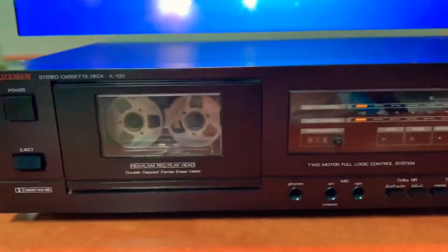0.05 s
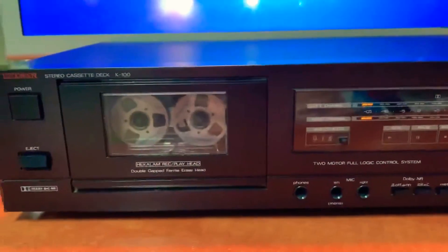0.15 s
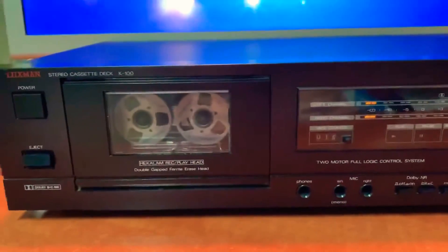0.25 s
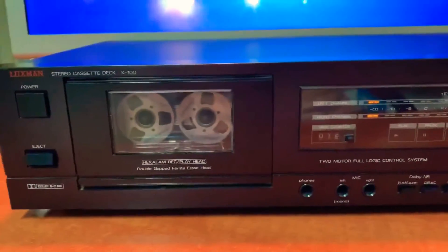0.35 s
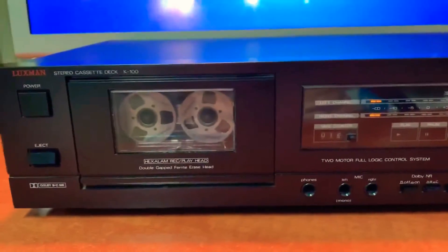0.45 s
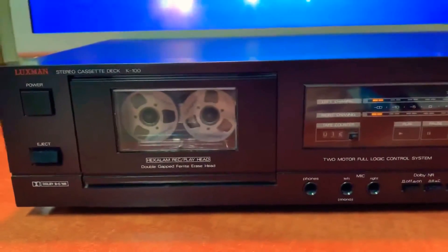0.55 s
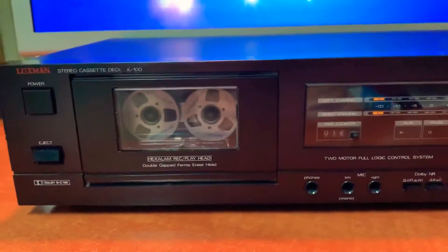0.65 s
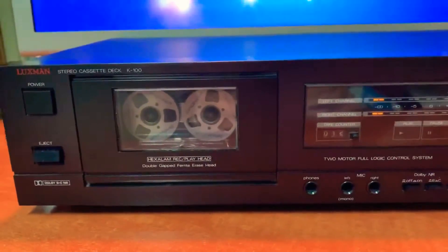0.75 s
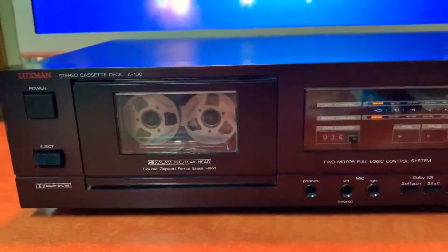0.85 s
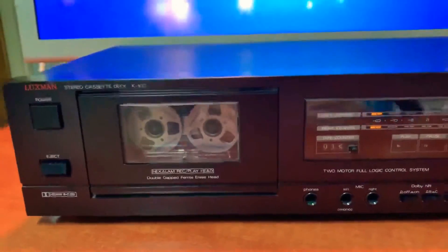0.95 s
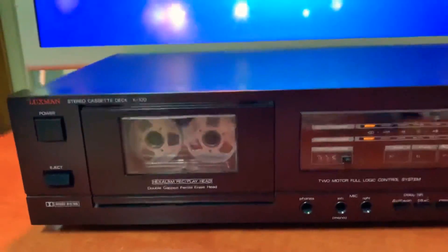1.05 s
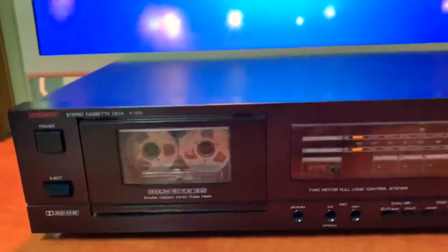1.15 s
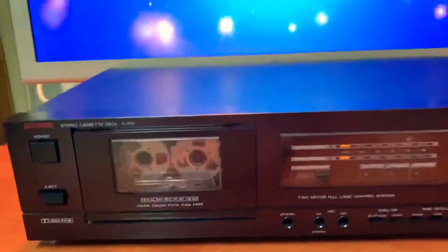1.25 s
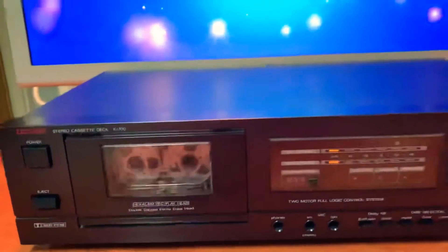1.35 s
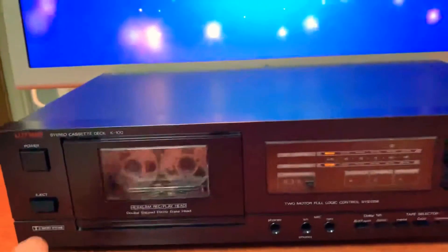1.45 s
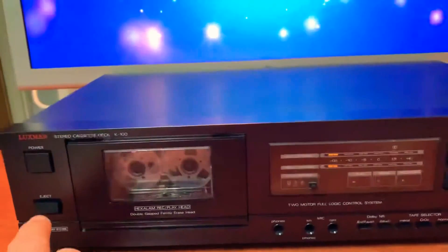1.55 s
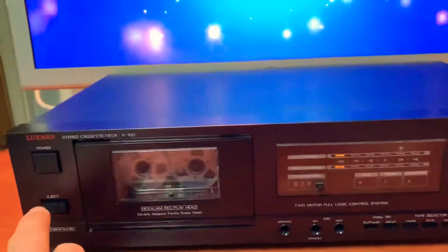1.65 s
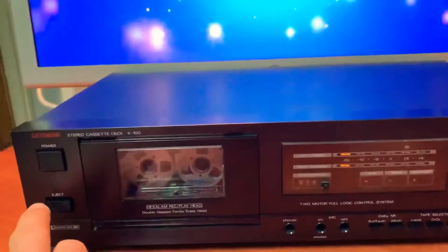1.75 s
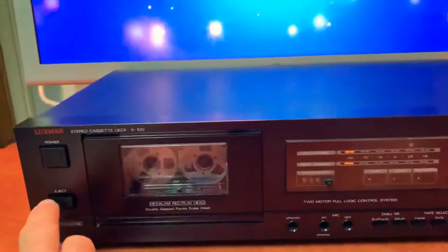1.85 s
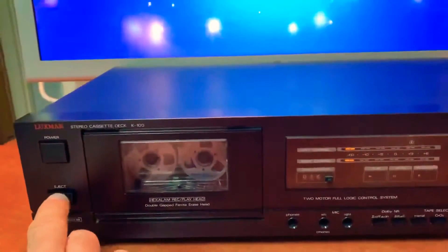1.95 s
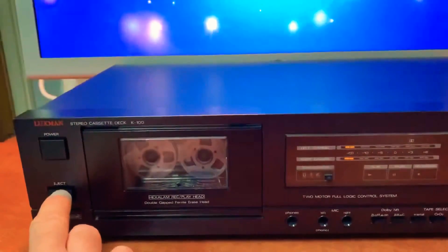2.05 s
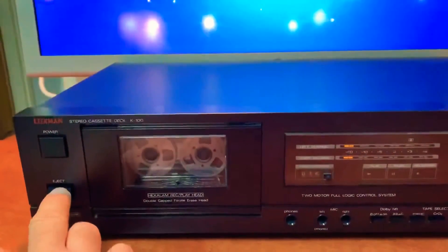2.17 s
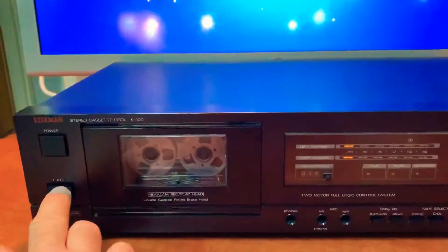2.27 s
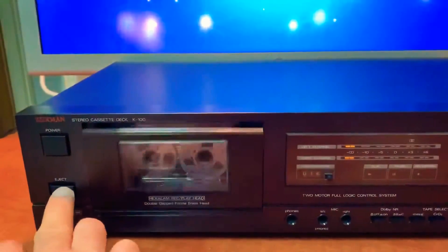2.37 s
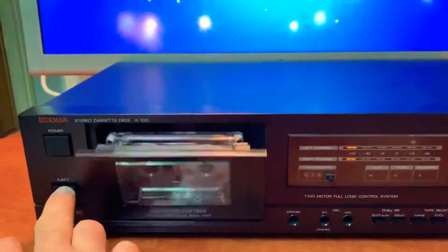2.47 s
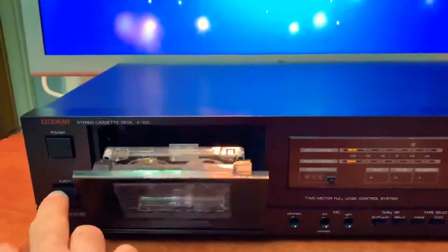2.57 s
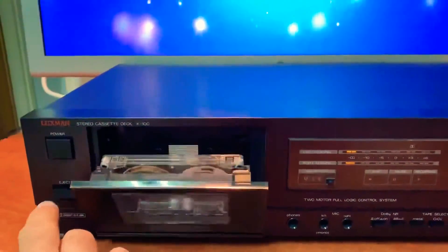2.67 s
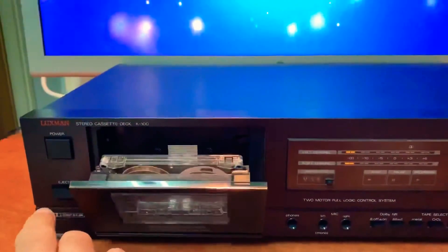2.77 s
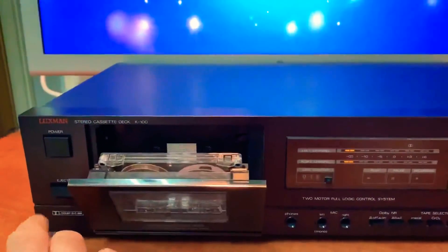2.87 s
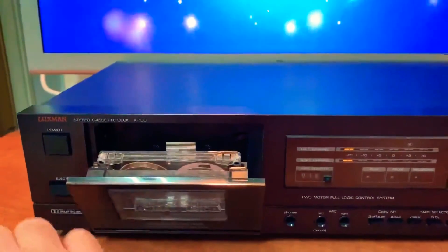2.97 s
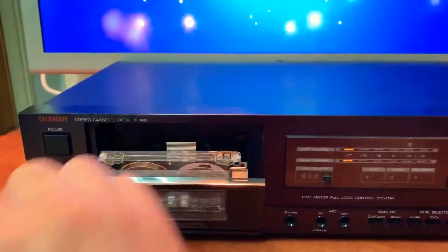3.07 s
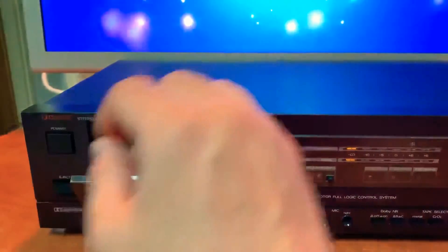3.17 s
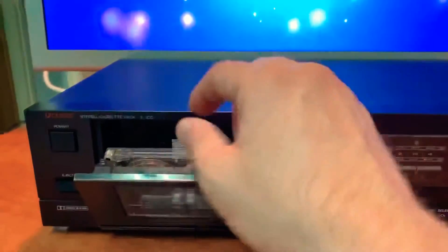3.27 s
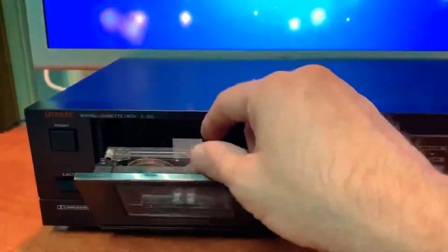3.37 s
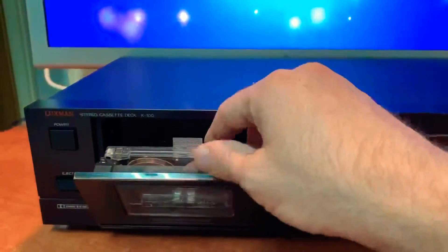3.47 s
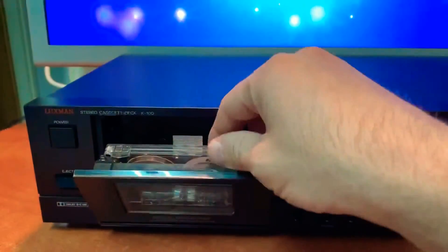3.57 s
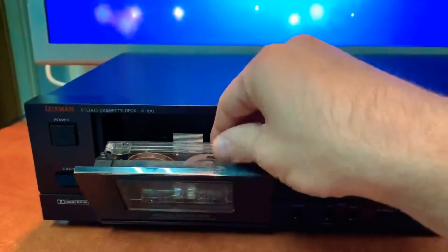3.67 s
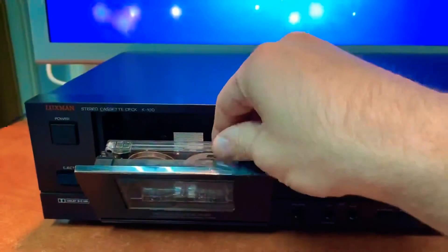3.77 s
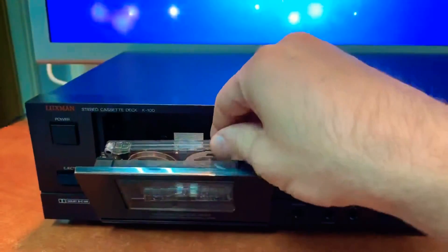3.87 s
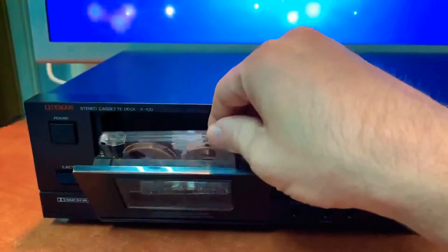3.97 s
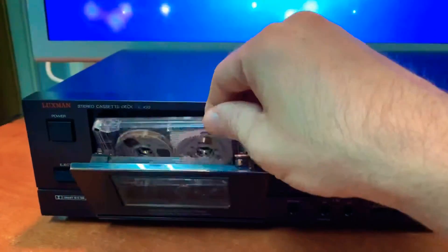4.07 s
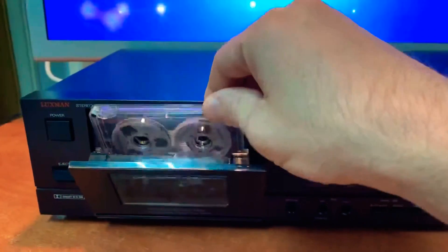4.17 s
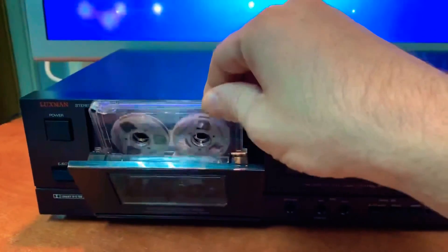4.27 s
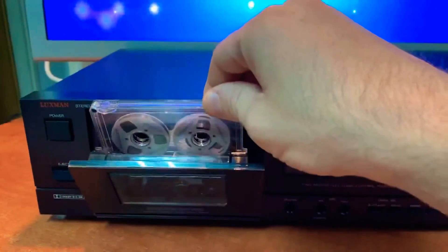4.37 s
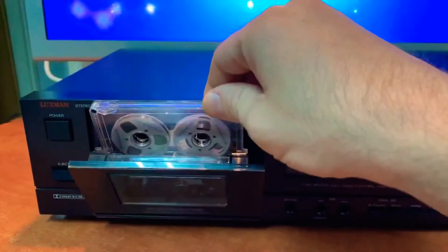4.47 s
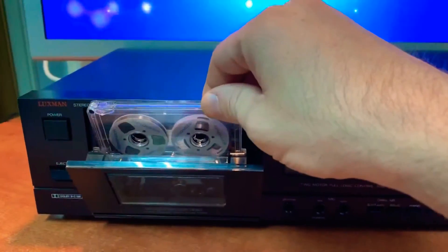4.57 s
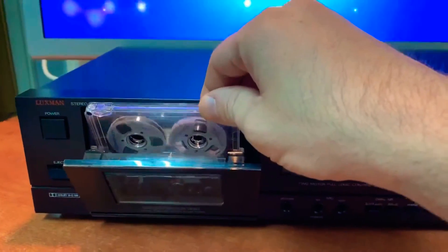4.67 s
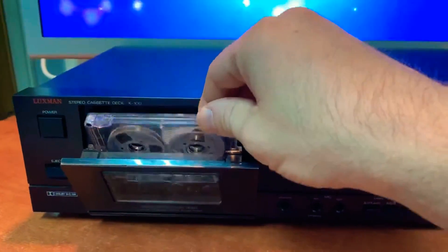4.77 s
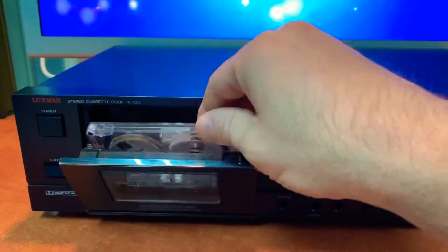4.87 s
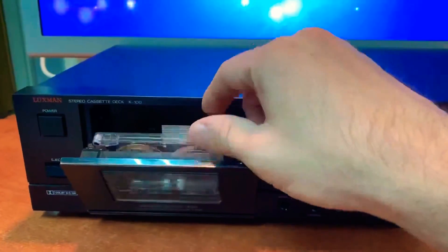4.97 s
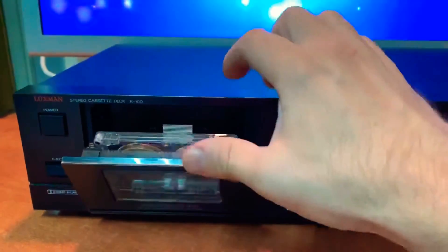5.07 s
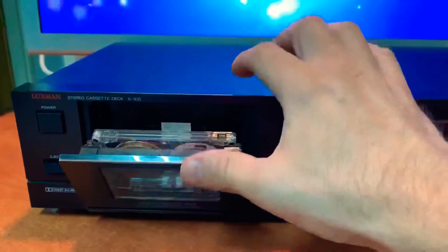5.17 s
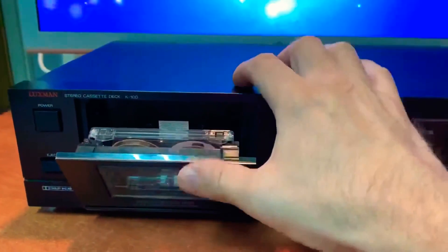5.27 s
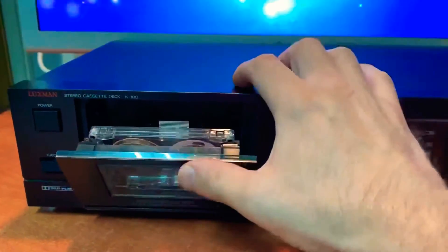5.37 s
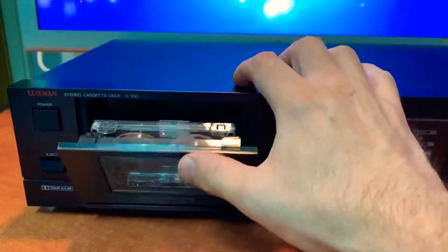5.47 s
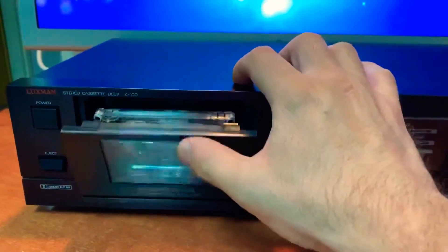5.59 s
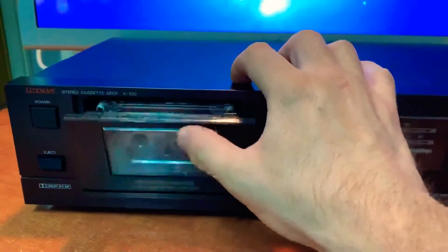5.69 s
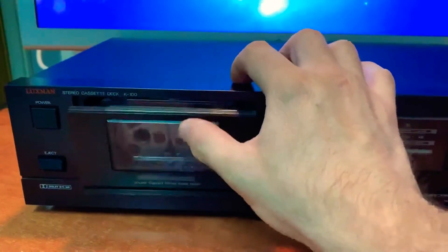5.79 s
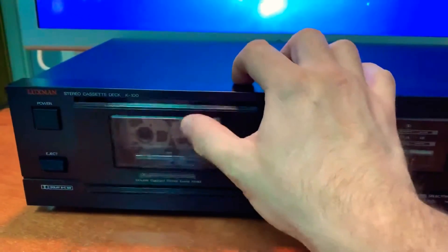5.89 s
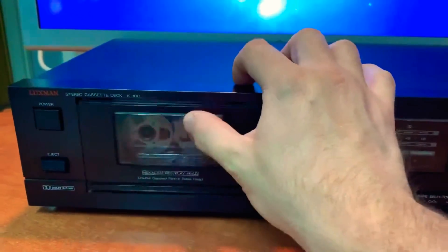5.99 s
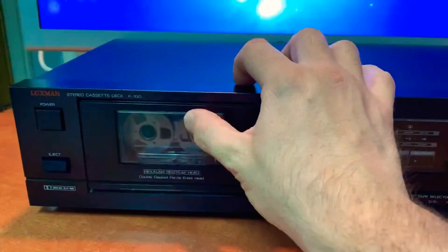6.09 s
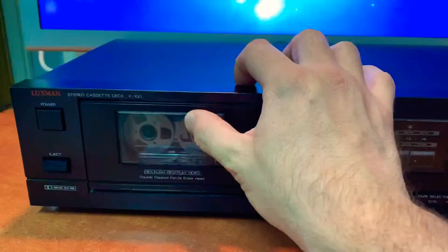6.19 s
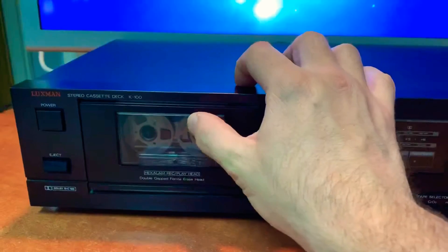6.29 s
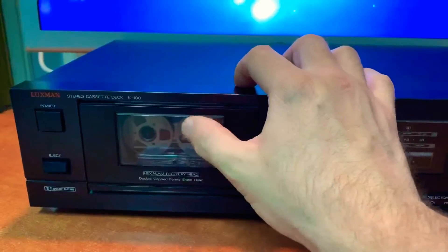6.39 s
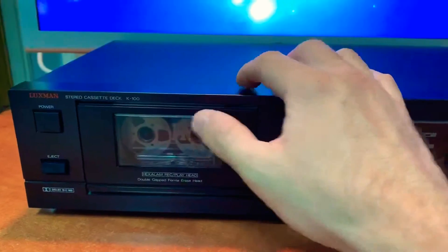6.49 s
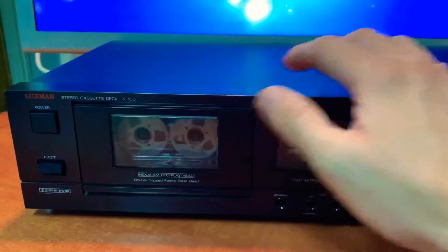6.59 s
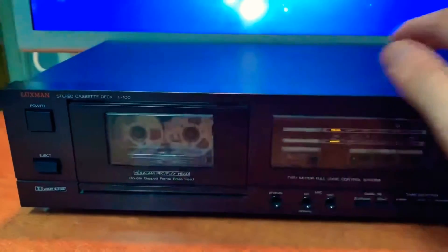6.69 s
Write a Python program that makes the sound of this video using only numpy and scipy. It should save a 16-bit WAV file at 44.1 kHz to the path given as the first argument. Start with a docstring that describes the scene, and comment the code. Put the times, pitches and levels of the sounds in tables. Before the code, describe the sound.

Low fan and mains drone with airy noise runs throughout, growing slightly early on. Over it come a small rattly lever release, a muted button press, a quick run of spring and plastic ticks as the door opens, tiny fingertip rubs, then a hard cassette clack that bounces, and finally a sharp door snap with a boxy boom and springy ring. Recorded near the deck, in a small room with a short tail.

```python
"""Cassette deck eject and reload

A deck on a table in a small humming room, heard close on a hand-held phone with two microphone ports.
The transport stops with a clunk, the eject latch springs the door open, fingers lift the cassette and
let it drop back into its holder, and the door is pushed shut. Clicks ring plastic, spring and shell modes;
levers ring a frame, bumps boom the steel case, skin rubs in noise strokes, and the room adds an echo."""
import sys
import numpy as np
from scipy import signal
from scipy.fft import rfft, irfft
from scipy.io import wavfile
from scipy.ndimage import uniform_filter1d

SR = 44100
rng = np.random.default_rng(int(sys.argv[2]) if len(sys.argv) > 2 else 0)


def store_pcm(level_fs):
    """Save levels as 16-bit WAV."""
    pcm = np.round(np.clip(level_fs, -1, 1) * 32767).astype(np.int16)
    wavfile.write(sys.argv[1], SR, np.atleast_2d(pcm).T)


N = 297234
T = np.arange(N) / SR
RING_T = T[:SR // 3]  # time axis of one impact or echo
TOP_HZ = 15900  # upper limit of the phone and of the small-part resonances


def undb(db):
    """Decibels to gain."""
    return 10 ** (np.asarray(db) / 20)


def spectrum_at(points, hz):
    """Gain of a (freq_hz, level_db) table on a log-frequency axis."""
    point_hz, level_db = np.transpose(points)
    return undb(np.interp(np.log(hz + 1), np.log(point_hz), level_db))


def unit(x):
    """Scale to rms 1."""
    return x / np.sqrt(np.mean(x ** 2))


def blow(x):
    """Scale a transient to the energy of 2 ms at rms 1."""
    energy = np.mean(np.sum(x ** 2, axis=-1))
    return x / np.sqrt(energy / (.002 * SR))


def colour(x, points, tilt_db=0, size=1024):
    """Minimum-phase filter with the given spectrum, tilted in dB per octave about 4 kHz."""
    hz = np.fft.rfftfreq(size, 1 / SR)
    octaves = np.log2(np.maximum(hz, 500) / 4000)  # no further tilt below 500 Hz
    cepstrum = irfft(np.log(spectrum_at(points, hz) * undb(tilt_db * octaves)))
    # folding the cepstrum forward makes the filter causal
    cepstrum[1:size // 2] *= 2
    cepstrum[size // 2 + 1:] = 0
    response = irfft(np.exp(rfft(cepstrum)))
    return signal.fftconvolve(x, response[None], axes=-1)[:, :x.shape[-1]]


# side against mid of sound from all around: freq_hz, level_db
SURROUND_WIDTH = [(60, -32.5), (130, -12), (290, -17.5), (640, -3), (1400, -3.5), (4500, 3.5), (7000, -3.5)]


def diffuse(count, points=((20, 0), (20000, 0))):
    """Stereo noise from all around: alike in the bass, wider above."""
    hz = np.fft.rfftfreq(count, 1 / SR)
    mid, side = rfft(rng.standard_normal((2, count))) * spectrum_at(points, hz)
    side = side * spectrum_at(SURROUND_WIDTH, hz)
    return unit(irfft(np.array([mid + side, mid - side]), count))


def walk(rate):
    """Slow random curve with rms near 1, drawn rate times a second and smoothed twice."""
    k = int(SR / rate)
    steps = np.repeat(rng.standard_normal(N // k + 1), k)
    return unit(uniform_filter1d(uniform_filter1d(steps, k), k)[:N])


def fade(t60):
    """Exponential decay by 60 dB in t60 seconds."""
    return np.exp(-np.log(1000) * RING_T / max(t60, 1e-3))


def onset(rise_s):
    """Exponential rise towards 1 with time constant rise_s."""
    return 1 - np.exp(-RING_T / rise_s)


def grains(spread_db, hold_s):
    """Gain that jumps to a new random level every hold_s, with rms 1."""
    step = (RING_T / max(hold_s, 1 / SR)).astype(int)
    return unit(undb(spread_db * rng.standard_normal(len(RING_T))[step]))


def ring(modes, centre_hz, reach, scatter_db, rise_s, length=1):
    """Modes struck once; the blow favours those within reach octaves of centre_hz; length scales decay."""
    sound = 0
    for hz, db, t60 in modes:
        level_chance, phase_chance = rng.standard_normal(2)
        favour = 1 / (1 + (np.log2(hz / centre_hz) / reach) ** 2)
        wave = np.sin(2 * np.pi * hz * RING_T + 1.2 * phase_chance)
        sound = sound + undb(db + scatter_db * level_chance) * favour * fade(t60 * length) * wave
    return blow(sound * onset(rise_s))


def panned(pan_db):
    """Gains of the two ports for a level difference of left minus right."""
    return undb(np.array([[pan_db], [-pan_db]]) / 2)


def add(track, s, sound):
    """Mix a sound in at time s."""
    start = int(s * SR)
    track[:, start:start + sound.shape[-1]] += sound[..., :N - start]


def tone(hz, waver_db=2.5, drift_hz=1.223):
    """A sine line that wavers in level and pitch."""
    phase = 2 * np.pi * np.cumsum(hz + drift_hz * walk(9)) / SR
    return undb(waver_db * walk(7)) * np.sqrt(2) * np.sin(phase)


# spectra of the rushing air and the thin hiss: freq_hz, level_db (relative)
AIR_COLOUR = [(15, -26.5), (28, -9), (55, -6), (82, -6), (102, -10.5), (151, -8), (188, -2), (273, -10),
              (385, -12.5), (530, -13.5), (730, -23), (1900, -28.5), (3120, -37), (5500, -51),
              (9000, -55.5), (16000, -86)]
HISS_COLOUR = [(9000, -49.5), (12000, -16), (13200, -5), (14200, 1), (15600, 6), (17000, -37.5)]
# fan and mains tones, at the full level the hum reaches: pitch_hz, level_db
HUM_TONES = [(75.2, -47), (112.5, -53.5), (135.5, -56.5), (226, -55.5), (302, -59.5), (442, -60),
             (511, -59), (544, -58), (1200, -65)]
# deepest drone: time_s, level_db
DRONE_LEVEL = [(0.06, -51.5), (1.17, -55), (1.3, -77), (1.58, -56), (3.22, -43.5), (5.11, -50.5),
               (6.27, -39), (6.57, -59), (6.7, -44)]
# strongest fan tone: time_s, level_db (before a small trim)
FAN_LEVEL = [(0, -55.5), (1.3, -50.5), (2.5, -44), (3.2, -50), (4.1, -47), (4.7, -41), (5.1, -52),
             (5.5, -44.5), (5.95, -48.5), (6.5, -43.5)]
DRONE_HZ, FAN_HZ = 50.4, 187.3
HUM_START_DB, HUM_FULL_S = -8.5, 2.46  # air, hiss and hum tones grow from this far down, then hold


def hum(air_db=-41.0, hiss_db=-61.0, hiss_follow=0.95, fan_trim_db=-0.5, lag_s=0.00014):
    """Fans and mains drone in wavering tones over rushing air and a thin high hiss."""
    level_db = HUM_START_DB * np.maximum(1 - T / HUM_FULL_S, 0)
    drone_db = np.interp(T, *np.transpose(DRONE_LEVEL))
    drone = tone(DRONE_HZ, waver_db=0.5, drift_hz=0.72) * undb(drone_db)
    fan_db = fan_trim_db + np.interp(T, *np.transpose(FAN_LEVEL))
    fan = tone(FAN_HZ, waver_db=2.0, drift_hz=5.87) * undb(fan_db)
    lines = sum(undb(db) * tone(hz) for hz, db in HUM_TONES)
    tones = drone + fan + lines * undb(level_db)
    tones = np.array([np.interp(T - lag_s, T, tones), tones])  # they come from the right
    air = diffuse(N, AIR_COLOUR) * undb(air_db + 0.15 * walk(4.7) + level_db)
    hiss = diffuse(N, HISS_COLOUR) * undb(hiss_db + hiss_follow * level_db)
    return tones + air + hiss


# sprung levers inside the case:
# start_s, level_db (relative), rattle_t60_s, tilt_db_per_octave, strongest_frame_hz
LEVER_RELEASES = [(0.9057, -27, 0.041, -1, 950), (.909, -29.5, 0.022, 2, 2000), (.914, -27, 0.11, -1, 1300),
                  (.932, -30, 0.044, 0, 420), (.946, -36, 0.11, 4, 1400), (.9805, -38, .012, -5, 800),
                  (2.423, -37, 0.027, -8.5, 420), (2.439, -33, .03, -11, 1800), (2.491, -28, 0.035, 0, 950),
                  (2.496, -23, 0.11, 1, 1950), (2.513, -26.5, 0.027, 1, 905),
                  (2.523, -29.5, 0.079, 1.5, 1100), (2.543, -36, 0.11, 3, 416),
                  (2.580, -33.5, .03, -1.5, 1000)]
# spectrum of the rattle: freq_hz, level_db (relative)
RATTLE_COLOUR = [(100, -9), (350, 2.5), (620, 3.5), (920, 2.5), (1200, -3), (2300, 3.5), (3300, -7),
                 (4400, -8.5), (5700, -12), (7500, -10), (8800, -4), (11000, -28), (13600, -5),
                 (15500, -61)]
# steel transport frame: pitch_hz, level_db (relative), t60_s
STEEL_FRAME = [(302, 0, .16), (416, 4, .22), (770, -2, .14), (914, 6, .17), (1005, 1, .12), (1270, -5, .1),
               (1430, -4, .14), (1795, -6, .15), (1985, -5, .12), (2230, -9, .07), (2310, -4, .1),
               (2400, -8, .09), (2775, -12, .12), (4027, -7, .2), (4270, -8, .18), (4920, -9, .17),
               (7200, -5, .25), (8340, 0, .22)]


def levers(tail_t60=0.32, tail_db=-11, frame_db=-5.0, pan_db=2.0):
    """A sprung lever lets go and rebounds: small impacts that ring on in the steel frame and the case."""
    out = np.zeros((2, N))
    for s, db, t60, tilt_db, frame_hz in LEVER_RELEASES:
        impacts = grains(spread_db=6, hold_s=.001)
        decay = impacts * fade(t60) + undb(tail_db) * fade(tail_t60)
        rattle = diffuse(len(RING_T)) * decay * onset(0.00095)
        rattle = blow(colour(rattle, RATTLE_COLOUR, tilt_db))
        frame = ring(STEEL_FRAME, frame_hz, reach=0.55, scatter_db=7.0, rise_s=0.0011)
        add(out, s, undb(db) * (rattle + undb(frame_db) * frame) * panned(pan_db))
    return out


# dull bumps, in turn: the transport drops back, the eject button, the door judders open,
# the cassette is lifted and lands, the door shuts
# start_s, level_db (relative), strongest_hz, length (share of the free ring)
CASE_BUMPS = [ (0.907, -25, 310, 0.77), (.932, -32, 290, .2), (0.981, -29.5, 480, 0.083),
              (0.985, -39, 165, 0.46), (2.096, -18, 240, 0.68), (2.41, -19.5, 95, 0.38),
              (2.423, -18.5, 234, 0.45), (2.46, -18.5, 201, 0.73), (2.495, -20, 330, .6),
              (2.544, -26, 448, 0.38), (2.587, -18, 230, 0.86), (2.623, -17.5, 192, 0.63),
              (2.648, -17.5, 191, 0.86), (3.972, -25.5, 198, 0.75), (5.042, -19.5, 400, 0.54),
              (5.049, -16, 225, 0.64), (5.074, -14.5, 245, 0.65), (5.076, -16.5, 100, 0.73),
              (5.114, -17.5, 290, 1), (5.163, -21, 200, 0.41), (6.063, -27, 210, 0.54),
              (6.112, -8, 212, 0.71), (6.126, -9.5, 237, 0.68), (6.196, -13.5, 227, 0.62),
              (6.313, -29, 200, 0.94), (6.619, -16, 160, 1)]
# steel case on the table: pitch_hz, level_db (relative), t60_s
STEEL_CASE = [(102, 7, .14), (141, -3, .14), (186, -3, .14), (212, 0, .15), (241, 0, .15), (274, -4, .15),
              (303, -3, .2), (355, -3, .08), (440, -6, .22), (485, -7, .16)]


def thuds():
    """The steel case booms on the table; a part that stays in contact cuts the boom short."""
    out = np.zeros((2, N))
    for s, db, hz, length in CASE_BUMPS:
        boom = ring(STEEL_CASE, hz, reach=0.4, scatter_db=3.5, rise_s=0.011 * length ** 2, length=length)
        add(out, s, undb(db) * boom)
    return out


# spectrum of the room's echoes: freq_hz, level_db (relative)
ECHO_COLOUR = [(100, -4.5), (250, 8), (600, 9.5), (1400, 7.5), (3000, 5), (8000, 3), (16000, -4)]
ROOM_T60_LOW_S, ROOM_T60_HIGH_S = 0.46, 0.37


def room(x, wet_db=-9, split_hz=1500, build_s=0.0033):
    """Table and walls return a short tail of uneven, clustered echoes."""
    noise = diffuse(len(RING_T), ECHO_COLOUR) * grains(spread_db=2.5, hold_s=.003)
    low = signal.sosfilt(signal.butter(2, split_hz, fs=SR, output="sos"), noise)
    high = noise - low
    tail = (low * fade(ROOM_T60_LOW_S) + high * fade(ROOM_T60_HIGH_S)) * onset(build_s)
    tail = tail / np.sqrt(np.sum(tail ** 2) / 2)
    return undb(wet_db) * signal.fftconvolve(x.mean(axis=0)[None], tail, axes=-1)[:, :N]


# skin and plastic sliding on plastic: start_s, length_s, level_db (relative)
RUB_STROKES = [(1.267, 0.31, -62.5), (1.832, 0.03, -64), (2.403, 0.15, -49.5), (3.57, 0.041, -61),
               (3.717, .03, -61), (3.954, 0.23, -63.5), (4.785, 0.27, -66.5), (6.06, 0.039, -45)]
# spectrum of the rubbing: freq_hz, level_db (relative)
RUB_COLOUR = [(400, -0.5), (1500, 4), (3000, -0.5), (5500, -5.5), (8300, 5.5), (9500, -14), (13000, 1.5),
              (16000, -7)]
STROKE_ATTACK_S = .035
STROKE_RELEASE_S, STROKE_RELEASE_SHARE = .1, 2.2  # to -60 dB: fixed part plus a share of the length


def rubbing(uneven_db=3.0, grain_db=-1.0, swell_db=7.0):
    """Surfaces slide in uneven strokes, catching in tiny steps; long strokes ease off slowly."""
    pressure = np.zeros(N)
    for s, length, db in RUB_STROKES:
        release_s = STROKE_RELEASE_S + STROKE_RELEASE_SHARE * length
        attack = np.clip((T - s) / STROKE_ATTACK_S, 0, 1)
        release = np.exp(-np.log(1000) * np.maximum(T - s - length, 0) / release_s)
        pressure += undb(db) * attack * release
    unevenness = undb(swell_db * walk(15) + uneven_db * walk(67) + grain_db * walk(980))
    return diffuse(N, RUB_COLOUR) * pressure * unevenness


def clack(hz, peak_s, overtone=1.6, overtone_db=-15):
    """The struck spot of a plastic panel swings a few times and gives its motion to the chassis."""
    turn = 2 * np.pi * hz * RING_T
    swing = np.sin(turn) + undb(overtone_db) * np.sin(overtone * turn)
    return blow(swing * RING_T * np.exp(-RING_T / peak_s))


def small_parts(low_hz, count, spread_db=4):
    """The crowded resonances of clips, springs and ribs, undamped, with rms 1."""
    lines = np.zeros(len(RING_T) // 2 + 1, complex)
    place = np.sqrt((np.arange(count) + rng.random(count)) / count)  # crowds towards the top
    hz = low_hz * (TOP_HZ / low_hz) ** place
    level = undb(spread_db * rng.standard_normal(count))
    phase = np.exp(2j * np.pi * rng.random(count))
    lines[(hz * len(RING_T) / SR).astype(int)] = level * phase
    return unit(irfft(lines, len(RING_T)))


# plastic door and holder: pitch_hz, level_db (relative), t60_s
DOOR_PANEL = [(630, -10, .06), (718, -2, .1), (800, -6, .07), (851, -7, .05), (925, -3, .06),
              (995, -3, .06), (1065, -3, .05), (1201, 1, .09), (1305, -1, .05), (1406, -1, .06),
              (1470, -5, .04), (1696, -12, .04)]
# crack summed over all directions, a smoother spectrum: freq_hz, level_db (relative)
ALL_ROUND_CRACK = [(200, 23), (700, 6), (2000, 10.5), (3500, 1), (7000, -4), (11500, -7.5), (14000, -6),
                   (16000, -20)]
CLACK_HARD_S, CLACK_SOFT_S = 0.00068, 0.0014  # time to the peak of a hard and of a soft contact
TILT_PER_DB = 0.5  # hard contacts are bright: dB per octave for each dB of crack over clack


def knocks(table, crack_colour, part_modes, pan_db, panel_db, part_db, room_db, crack_t60=0.0079,
           scuff_t60=0.049, rise_share=0.02, buzz_t60=0.08, buzz_db=-23, wide_db=-7,
           door_lead_s=0.00026, crack_pan_db=4.5):
    """Contacts crack and clack, ring the door and a spring or shell, buzz small parts; the room answers."""
    near, radiated = np.zeros((2, N)), np.zeros((2, N))
    parts = small_parts(1500, count=200)
    for s, clack_db, crack_db, clack_hz in table:
        tilt_db = TILT_PER_DB * (crack_db - clack_db)
        t60 = crack_t60 + scuff_t60 / (1 + undb(crack_db + 26.5))  # light touches scuff for longer
        scrape = rng.standard_normal(len(RING_T)) + undb(wide_db) * diffuse(len(RING_T))
        buzz = undb(buzz_db) * parts * fade(buzz_t60)
        contact = (scrape * fade(t60) + buzz) * onset(rise_share * t60)
        # a hard contact pushes for less time than a soft one
        hardness = min(undb(crack_db - clack_db), 1)
        peak_s = CLACK_SOFT_S + hardness * (CLACK_HARD_S - CLACK_SOFT_S)
        panel = ring(DOOR_PANEL, clack_hz, reach=0.95, scatter_db=7.0, rise_s=0.002)
        door = undb(clack_db) * (clack(clack_hz, peak_s) + undb(panel_db) * panel)
        door = np.array([door, np.interp(RING_T - door_lead_s, RING_T, door)])  # left port is nearer
        part = ring(part_modes, centre_hz=6000, reach=3.0, scatter_db=-0.5, rise_s=0.0005)
        part = undb(part_db + crack_db) * part
        crack = blow(colour(contact, crack_colour, tilt_db)) * undb(crack_db)
        add(near, s, crack * panned(crack_pan_db) + door * panned(pan_db) + part)
        all_round = blow(colour(contact, ALL_ROUND_CRACK, tilt_db)) * undb(crack_db)
        add(radiated, s, all_round + undb(room_db) * door)
    return near + room(radiated)


# in turn: finger meets the eject button, the button slides the catch back, the door swings out;
# the door is pushed in, the latch rides over its catch and snaps home, the door chatters
# against it, the thumb eases off
# start_s, clack_db (relative), crack_db (relative), clack_hz
DOOR_CONTACTS = [ (2.093, -32, -41.5, 1390), (2.098, -29.5, -42, 760), (2.387, -37, -33, 1540),
                 (2.394, -31.5, -42, 1450), (2.403, -31.5, -46, 1400), (2.412, -40, -49, 1340),
                 (2.424, -28, -35, 1140), (2.438, -29, -45, 1210), (2.451, -27.5, -44, 1300),
                 (2.460, -38, -49, 1080), (2.465, -52, -29.5, 1200), (2.572, -29, -37, 1310),
                 (2.580, -32.5, -39, 1400), (2.586, -30.5, -42, 1020), (2.743, -35, -53, 1230),
                 (2.745, -34, -51, 930), (5.937, -32, -38.5, 1440), (6.011, -31, -37.5, 1260),
                 (6.0595, -22.5, -24, 1200), (6.063, -21, -45, 920), (6.079, -22, -46, 1360),
                 (6.0865, -38, -23, 1400), (6.0905, -23, -37, 1260), (6.1068, -15, -17.5, 1750),
                 (6.108, -11, -24, 1340), (6.112, -18, -12.5, 1300), (6.1168, -16.5, -5.5, 1340),
                 (6.1176, -6.5, -5.5, 1170), (6.1222, -13.5, -25, 1895), (6.1245, -26, -13.5, 1770),
                 (6.126, -17, -25, 910), (6.132, -21.5, -35, 800), (6.348, -35, -47, 1290),
                 (6.566, -43, -56, 1190)]
# crack of the latch towards the phone: freq_hz, level_db (relative)
LATCH_COLOUR = [(200, -2.5), (800, -11), (1800, -1), (2900, 4.5), (4200, 8), (6000, 1), (7600, -5.5),
                (8500, 6), (9100, 0.5), (11000, 4), (13400, -4), (16000, -12.5)]
# door spring: pitch_hz, level_db (relative), t60_s
DOOR_SPRING = [(1863, 13, .12), (1990, 1, .09), (2290, 1, .07), (2946, -7, .14), (3710, -1, .15),
               (4242, -6, .16), (4791, -2, .18), (5250, -2, .17), (6030, -5, .18), (6944, -8, .17),
               (7090, -9, .17), (8530, 1, .07), (8590, 2, .07)]


def door_and_latch():
    """Button, catch and latch crack, clack the plastic door and ring its spring."""
    return knocks(DOOR_CONTACTS, LATCH_COLOUR, DOOR_SPRING, pan_db=2, panel_db=-2, part_db=-9, room_db=-4.0)


# the cassette in its holder, in turn: it is lifted, slides down, drops and bounces
# start_s, clack_db (relative), crack_db (relative), clack_hz
CASSETTE_CONTACTS = [ (3.570, -40, -46, 1260), (3.969, -26, -35, 860), (3.972, -30.5, -51, 1250),
                     (4.070, -39.5, -47, 1300), (4.223, -41, -41.5, 1200), (4.357, -49, -46, 1300),
                     (4.900, -38, -51, 1200), (4.970, -37, -51, 1300), (5.027, -31.5, -30, 1000),
                     (5.0388, -9, -5.5, 1400), (5.041, -18, -13.5, 1200), (5.0445, -19.5, -28, 750),
                     (5.049, -17, -35.5, 1330), (5.0585, -14, -9.5, 1600), (5.0603, -13.5, -13.5, 1210),
                     (5.0758, -20, -27.5, 1110)]
# crack of the cassette towards the phone: freq_hz, level_db (relative)
CASSETTE_COLOUR = [(200, -5), (800, -1), (1800, -1), (2300, 1.5), (2800, -1), (4000, 7), (4700, 0.5),
                   (6200, -16), (7000, -3.5), (7700, -9.5), (8300, 5), (8700, 5), (9300, -5.5), (11600, -7),
                   (16000, -23)]
# cassette shell: pitch_hz, level_db (relative), t60_s
CASSETTE_SHELL = [(791, 12, .14), (960, 4, .08), (1410, 7, .07), (2205, 0, .07), (2290, 3, .08),
                  (2840, -2, .1), (3040, -3, .08), (3950, -2, .08), (4450, -1, .06), (4950, -7, .12),
                  (7050, -10, .12), (8350, 0, .09), (8540, 2, .09), (8700, 0, .08)]


def cassette_in_holder():
    """The cassette knocks its holder, clacking the door's plastic and ringing its own shell."""
    return knocks(CASSETTE_CONTACTS, CASSETTE_COLOUR, CASSETTE_SHELL, pan_db=5.5,
                  panel_db=-11.5, part_db=-3.5, room_db=-6)


def scene():
    """The deck, its echo and the humming room."""
    background = hum()
    works = undb(-0.25) * levers() + undb(-3.0) * rubbing()
    case = undb(-6.5) * thuds()
    plastic = undb(-6.5) * (door_and_latch() + cassette_in_holder())
    echo = room(works + undb(-6.0) * case)
    return plastic + case + works + echo + background


LEFT_LAG_S, MONO_ABOVE_HZ = .000144, 6500


def record(dry):
    """The phone's two ports share their treble, the left slightly late; it clips, then cuts the top."""
    hz = np.fft.rfftfreq(N, 1 / SR)
    left, right = rfft(dry)
    mid = (left + right) / 2
    side = (left - right) / 2 / (1 + (hz / MONO_ABOVE_HZ) ** 10)
    late_left = (mid + side) * np.exp(-2j * np.pi * hz * LEFT_LAG_S)
    ports = irfft(np.array([late_left, mid - side]), N)
    top_cut = signal.ellip(10, .2, 80, TOP_HZ, fs=SR, output="sos")
    return signal.sosfilt(top_cut, np.clip(ports, -1, 1))


dry = scene()
out = record(dry)
store_pcm(out)
```